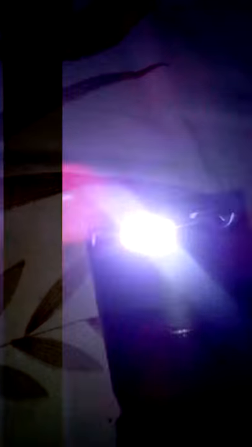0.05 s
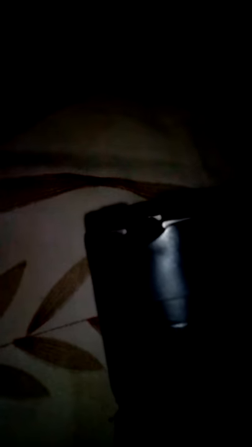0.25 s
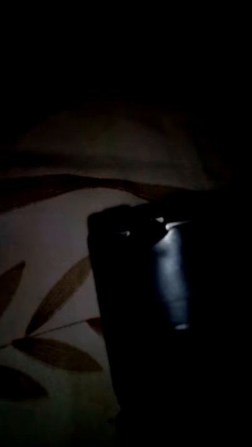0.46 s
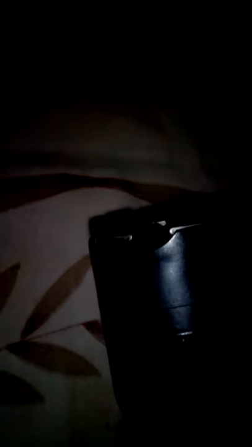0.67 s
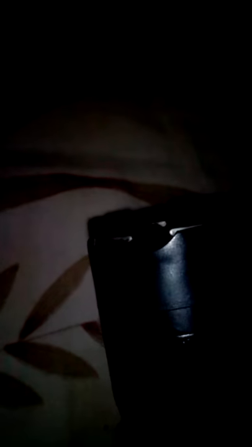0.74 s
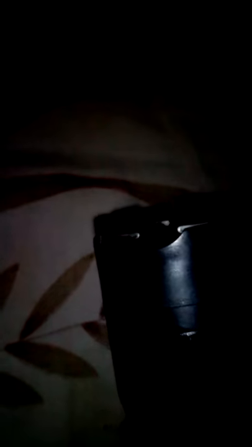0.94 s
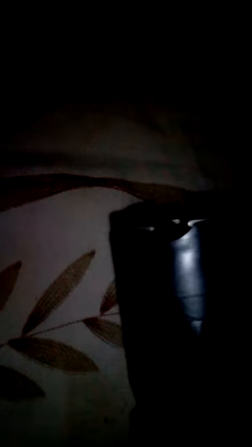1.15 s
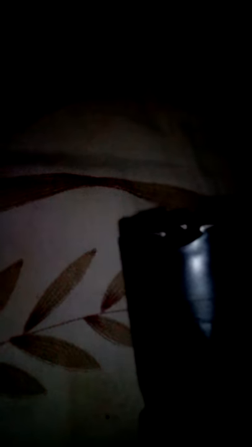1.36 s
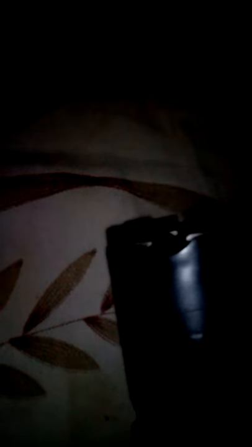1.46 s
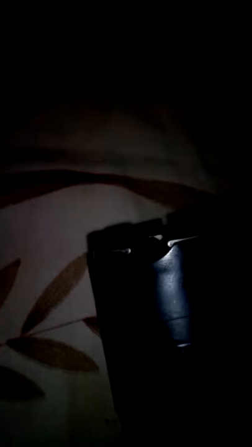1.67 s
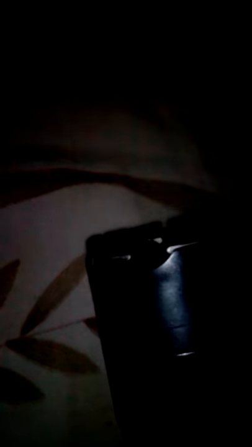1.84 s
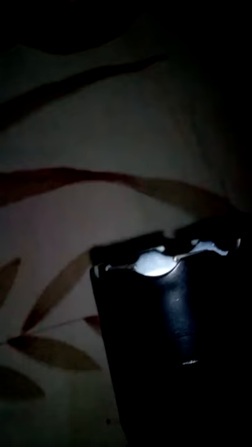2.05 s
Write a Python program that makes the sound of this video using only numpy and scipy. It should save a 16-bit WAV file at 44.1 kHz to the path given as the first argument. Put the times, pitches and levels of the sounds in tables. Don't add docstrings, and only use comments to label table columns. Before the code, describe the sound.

A stun device snaps four times very fast, close and overloaded, leaving faint hiss and air rumble

```python
import sys
import numpy as np
from scipy import signal
from scipy.fft import rfft, irfft
from scipy.io import wavfile

SR = 44100
rng = np.random.default_rng(int(sys.argv[2]) if len(sys.argv) > 2 else 0)


def output_pcm(signal):
    pcm = np.clip(np.atleast_2d(signal).T, -1, 1) * 32767
    wavfile.write(sys.argv[1], SR, np.round(pcm).astype(np.int16))


def gain_from_decibels(decibels):
    exponent = np.asarray(decibels, float) / 20
    return 10 ** exponent


N = 92610

# t/s, level/dB, port ring f/Hz, first and second diaphragm lurch [signed pressure]
SPARKS = [
    (.2174, -3, 7190, 0.21, -0.17),
    (.2526, -4.5, 6457, -0.29, -0.066),
    (.2899, -2, 7296, 0.2, -0.15),
    (.3273, -2, 7343, -0.12, -0.015),
]
# f/Hz, level/dB per Hz
TAIL_SPECTRUM = [(290, -72), (500, -37.5), (1250, -23), (2090, -25), (3580, -19.5), (3890, -15.5),
                 (7270, -3), (8810, -12.5), (11500, -52), (19400, -120)]
EDGE_S = 0.00013


def rms_one(x):
    return x / np.sqrt(np.mean(x ** 2) + 1e-20)


def at_hz(points, hz):
    table_hz, value = np.transpose(points)[:2]
    return np.interp(np.log(hz), np.log(table_hz), value)


def since(s):
    return np.arange(N) / SR - s


def gate(t, length_s, edge_s):
    return 0.5 * (np.tanh(t / edge_s) - np.tanh((t - length_s) / edge_s))


def bell(t, width_s):
    return np.exp(-0.5 * (t / width_s) ** 2)


def mode(t, hz, db, t60):
    decay = gain_from_decibels(db - 60 * np.abs(t) / t60)
    return (t > 0) * decay * np.sin(2 * np.pi * hz * t)


def coloured(spectrum):
    hz = np.arange(N // 2 + 1) * SR / N + 1
    white = rfft(rng.standard_normal(N))
    return rms_one(irfft(white * gain_from_decibels(at_hz(spectrum, hz)), N))


def drift(rate_hz):
    pole = np.exp(-2 * np.pi * rate_hz / SR)
    settled = signal.lfilter([1], [1, -2 * pole, pole * pole], rng.standard_normal(N + SR))[SR:]
    return rms_one(settled)


def microphone_hiss():
    # f/Hz, level/dB per Hz
    hiss_spectrum = [(240, -31.5), (400, -4), (498, -8), (553, -10.5), (1110, -10.5), (1200, -9),
                     (3380, -21.5), (6800, -14), (8810, -32), (11500, -69), (19400, -120)]
    return gain_from_decibels(-63.5 + 0.87 * drift(8)) * coloured(hiss_spectrum)


def draught():
    # t/s, level/dB
    air_start = [
        (0.001, -66.5),
        (.07, -67.5),
        (.12, -43.5),
        (.2, -58.5),
    ]
    # t/s, level/dB
    air_later = [(0.4, -58), (0.692, -53.5), (0.83, -55), (0.958, -61), (1.08, -52), (1.19, -51.5),
                 (1.312, -58), (1.564, -53.5), (1.716, -55.5), (1.858, -55), (2.1, -55.5)]
    # f/Hz, level/dB per Hz
    rumble_spectrum = [(15, -45), (25, -21.5), (79, -3.5), (118, 0), (204, -5), (419, -18.5), (600, -30.5),
                       (780, -52), (1320, -120)]
    # t/s, level/dB, f/Hz
    early_puffs = [
        (0.114, -35, 167),
    ]
    # t/s, level/dB, f/Hz
    later_puffs = [(0.504, -56, 72.6), (0.505, -39.5, 135), (0.64, -53, 110), (0.682, -55, 72.6),
                   (0.682, -38.5, 117.8), (0.829, -45.5, 88.8), (0.89, -51, 83.1), (1.001, -44.5, 139.8),
                   (1.068, -41.5, 166.4), (1.161, -37.5, 78.1), (1.286, -37, 128.4), (1.475, -42.5, 113),
                   (1.524, -55, 132.2), (1.603, -39, 153), (1.666, -47, 104.6), (1.778, -50, 72.5),
                   (1.778, -44, 237), (1.889, -44, 72.8), (1.889, -33, 183), (2.019, -43, 145)]
    width_cycles, puff_db, lead_s, sag = 1.02, -4, 0.00815, 0.2

    s, db = np.transpose(list(air_start) + list(air_later))
    out = gain_from_decibels(np.interp(since(0), s, db) + 2.5 * drift(25)) * coloured(rumble_spectrum)
    for s, db, hz in list(early_puffs) + list(later_puffs):
        t = since(s + lead_s)
        cycles = hz * t * (1 - sag * np.tanh(t * hz / 2))
        swing = np.sin(2 * np.pi * cycles + rng.uniform(0, 2 * np.pi))
        out += gain_from_decibels(db + puff_db) * bell(t, width_cycles / hz) * swing
    return out


def grip_creaks():
    # t/s, length/s, f/Hz, level/dB
    creaks = [
        (0.779, 0.025, 288.4, -56.5),
        (.835, 0.043, 277, -64.5),
    ]
    # multiple of f, level/dB
    harmonics = [(1, 0.5), (2, -2.5), (3, 0.1)]
    out = np.zeros(N)
    for s, length, hz, db in creaks:
        t = since(s)
        for k, tone_db in harmonics:
            out += gain_from_decibels(db + tone_db) * bell(t, length / 2) * np.sin(2 * np.pi * k * hz * t + k)
    return out


def switch_ticks():
    # t/s, level/dB
    ticks = [
        (.186, -59.5),
        (1.9407, -49),
    ]
    # f/Hz, level/dB, t60/s
    switch_modes = [(3210, -3.5, .02), (4400, -11, .012), (5684, -0.5, .015), (6300, 1, 0.014),
                    (7600, -5, 0.0077)]
    return sum(mode(since(s), hz, db + mode_db, t60)
               for s, db in ticks for hz, mode_db, t60 in switch_modes)


def room_answer():
    # f/Hz, t60/s
    room_t60 = [(600, .15), (2000, .17), (5000, .18), (7500, .19)]
    wall_s, build_s = 0.0043, 0.008
    t, noise, out = np.maximum(since(wall_s), 0), coloured(TAIL_SPECTRUM), np.zeros(N)
    edges = 350 * 2 ** np.arange(0, 5.1, 0.5)
    for low, high in zip(edges, edges[1:]):
        band_filter = signal.butter(2, [low, high], "band", fs=SR, output="sos")
        t60 = at_hz(room_t60, np.sqrt(low * high))
        out += signal.sosfiltfilt(band_filter, noise) * gain_from_decibels(-60 * t / t60)
    return out * (1 - np.exp(-t / build_s))


def room():
    # t/s, level/dB, length/s
    slaps = [
        (.2641, -20, .0008),
        (.2653, -9.5, .0008),
        (.2665, -17.5, .001),
    ]
    tail_db, same_path = -17, 0.7
    out, common = np.zeros(N), room_answer()
    for s, db, *_ in SPARKS:
        start = int(s * SR)
        answer = np.sqrt(same_path) * common + np.sqrt(1 - same_path) * room_answer()
        out[start:] += gain_from_decibels(db + tail_db) * answer[:N - start]
    echo_noise = coloured(TAIL_SPECTRUM)
    for s, db, length in slaps:
        out += gain_from_decibels(db - 1) * gate(since(s - length / 2), length, 2 * EDGE_S) * echo_noise
    return out


def diaphragm_lurches():
    lurch_s, lead_s, rebound_s, low_cut_hz = 0.0015, 0.0016, 0.003, 60
    push = np.zeros(N)
    for s, _, _, first, second in SPARKS:
        push += first * bell(since(s + lurch_s / 2), lurch_s / 3)
        push += second * gate(since(s + lead_s), rebound_s, lurch_s / 3)
    return signal.sosfilt(signal.butter(3, low_cut_hz, "high", fs=SR, output="sos"), push)


def spark_cracks():
    # delay/s, length/s, level/dB
    bounces = [
        (0.00001, .0015, -0.67),
        (.0019, .0008, -24),
        (.0029, .0009, -10.5),
    ]
    # f/Hz, level/dB per Hz
    crackle_spectrum = [(350, -40.5), (600, -5.5), (1330, -12), (3920, -12.5), (5680, 0.5), (7120, 2),
                        (8810, -30.5), (11500, -46.5), (19400, -120)]
    # f/Hz, level/dB, t60/s
    housing_modes = [(1400, -23.5, .012), (2306, -14.5, 0.0093), (3500, -20.5, .012), (5400, -14, 0.014)]
    out = np.zeros(N)
    wobble = 0.44 * drift(900)
    crackle = gain_from_decibels(-6.5) * coloured(crackle_spectrum)
    for k, (s, db, ring_hz, _, _) in enumerate(SPARKS):
        t = since(s)
        shape = sum(gain_from_decibels(bounce_db) * gate(t - lag, length, EDGE_S) for lag, length, bounce_db in bounces)
        out += gain_from_decibels(db) * shape * (np.sin(2 * np.pi * ring_hz * t + wobble) + crackle)
        for hz, mode_db, t60 in housing_modes:
            extra_db = 7 if k == 1 and hz > 4500 else 0
            out += mode(t, hz, db + mode_db + extra_db, t60)
    return out


def scene():
    background = microphone_hiss() + draught() + grip_creaks() + switch_ticks()
    sparks = room() + diaphragm_lurches() + spark_cracks()
    return (background + sparks)[None]


def band_limit(x):
    return signal.sosfilt(signal.butter(12, 8960, fs=SR, output="sos"), x)


def record(dry):
    # t/s, level/dB
    overs = [
        (0.2169, -33.5),
        (0.2518, -49),
        (0.2892, -36.5),
        (0.3262, -53),
    ]
    cutoff_hz, shelf_hz, dither_db = 8787, 16000, -82.5
    narrow = signal.cheby2(10, 45, 1.0646 * cutoff_hz, fs=SR, output="sos")
    x = signal.sosfiltfilt(narrow, dry)
    converter = gain_from_decibels(dither_db - 19.5) * rng.standard_normal(N)
    for s, db in overs:
        converter[int((s + 0.0008) * SR)] += gain_from_decibels(db + 9)
    shelf = signal.butter(8, shelf_hz, fs=SR, output="sos")
    mix = np.clip(x, -1, 1) + signal.sosfiltfilt(shelf, converter)
    return band_limit(mix)


dry = scene()
out = record(dry)
output_pcm(out)
```